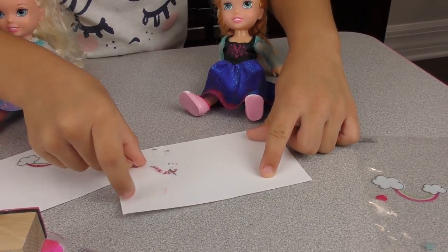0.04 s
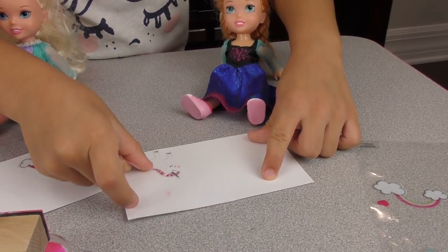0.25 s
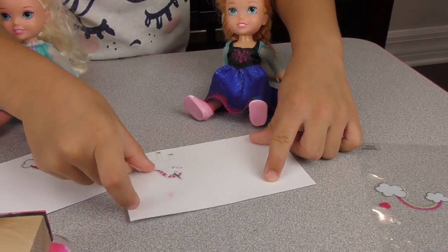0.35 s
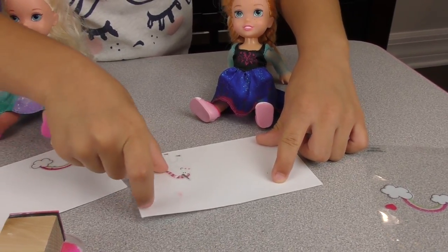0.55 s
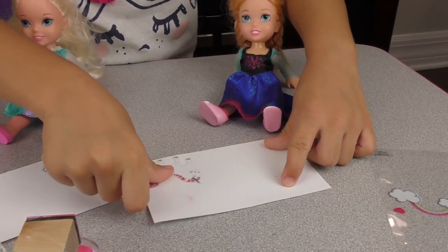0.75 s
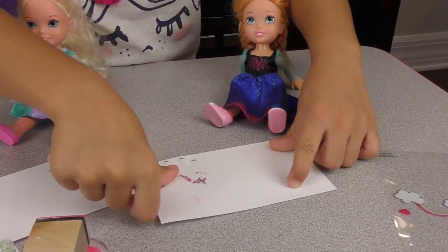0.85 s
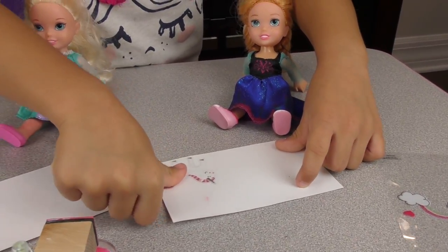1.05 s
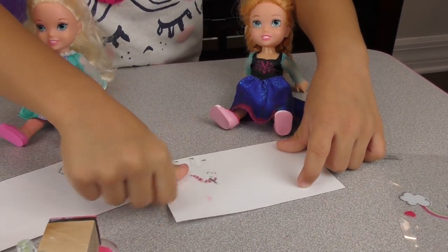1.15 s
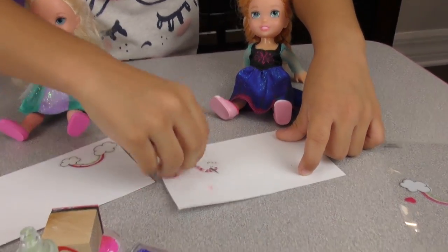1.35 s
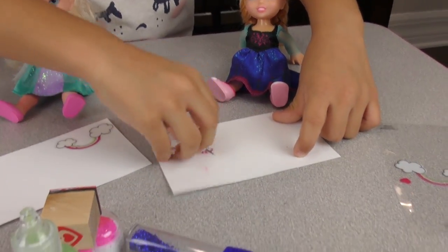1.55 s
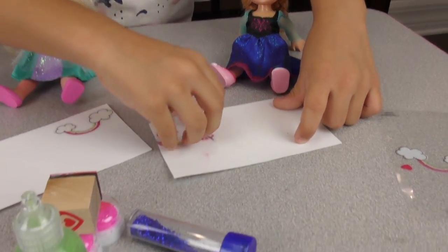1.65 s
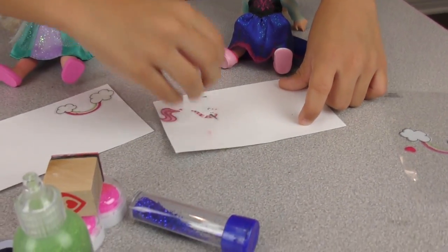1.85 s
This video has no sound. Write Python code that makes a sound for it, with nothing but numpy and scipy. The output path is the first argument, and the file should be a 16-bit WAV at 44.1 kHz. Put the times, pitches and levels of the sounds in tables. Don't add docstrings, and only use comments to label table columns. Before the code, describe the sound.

Sharp sticky-film snaps as a plastic sticker is pressed onto a card, then two tabletop knocks

```python
import sys
import numpy as np
from scipy import signal
from scipy.io import wavfile

SR = 44100
rng = np.random.default_rng(int(sys.argv[2]) if len(sys.argv) > 2 else 0)


def put_to_file(sound):
    columns = np.atleast_2d(sound).T
    safe = np.clip(columns, -1, 1)
    whole_steps = np.round(safe * 32767)
    wavfile.write(sys.argv[1], SR, whole_steps.astype(np.int16))


def ratio_of_db(decibels):
    return 10 ** (np.asarray(decibels, float) / 20)


N = 83790

# pitch [Hz], level [dB per Hz].
HUM = [(28, -52), (45, -8.5), (90, -6.5), (140, -7), (230, -5.5), (330, -15.5), (450, -19), (650, -61)]
# pitch [Hz], width [Hz], level [dB].
HUM_PEAKS = [(149.5, 53.7, -51), (217, 92, -58), (42, 15, -67)]
# pitch [Hz], level [dB per Hz].
HISS = [(600, -16), (800, -5.5), (1050, 2.5), (2400, -3), (3600, -8), (7000, -19.5), (11000, -9),
        (15800, -10.5)]
# pitch [Hz], likeness [0 to 1].
LIKENESS = [(40, 0.7), (150, 0.93), (500, 0.46), (2000, 0.4), (4400, 0.16), (8000, 1), (14000, 0.27)]
HUM_DB, HUM_PATCHY_DB, HUM_TOP_HZ, HUM_PAN_DB = -51, 2.5, 480, 0.4
HISS_DB = -57.5

# time in seconds, level [dB].
MOTOR = [
    (0, -54.5),
    (.3, -55),
    (.51, -55.5),
    (.535, -81),
    (.7, -78),
    (1.045, -65),
    (1.065, -55.5),
    (1.4, -56),
    (1.9, -54),
]
# pitch [Hz], width [Hz], level [dB].
HOUSING = [(1067, 51, -1), (1440, 410, -2.5), (1888, 66, 9.5), (1940, 28, 13.5), (2210, 310, 3.5),
           (2470, 210, 0.5), (2789, 56, 8), (3400, 330, -8), (3599, 84, 5), (1904, 1390, 1)]
MOTOR_WAVER_DB = 3

# pitch [Hz], time to fall 60 dB [s].
ROOM_T60 = [(200, 0.29), (1000, 0.56), (4000, 0.58), (8000, 0.48), (12000, 0.27), (16000, 0.48)]
# pitch [Hz], level [dB].
ROOM_COLOUR = [(200, 3.5), (1000, 8), (4000, 4), (8000, 2.5), (10500, -2.5), (13000, -5), (16000, 6)]
ROOM_DB, ROOM_GAP_S, ROOM_LIKENESS = -11.5, 0.0023, 0.87

# start [s], rise [s], fall [s], level [dB], grain pitch [Hz].
RUBS = [(0.039, 0.016, 0.036, -46.5, 11500), (0.072, 0.0032, 0.012, -45.5, 13000),
        (.078, 0.0041, 0.0083, -38, 13300), (.924, 0.0088, 0.11, -57.5, 10800),
        (.94, 0.082, .09, -62.5, 11100), (1.198, 0.061, 0.019, -51.5, 10900),
        (1.305, 0.0053, 0.013, -53, 11000), (1.315, 0.018, 0.05, -49, 10300),
        (1.431, 0.0044, 0.014, -37, 10600), (1.465, 0.02, .015, -48.5, 11300),
        (1.617, 0.0025, 0.016, -29, 10100), (1.618, 0.003, 0.057, -47, 11020),
        (1.67, 0.039, 0.036, -49, 11400), (1.824, 0.0056, 0.035, -50, 12100),
        (1.835, 0.028, 0.035, -53.5, 11300)]
# pitch [Hz], level [dB per Hz].
RUB = [(900, -12), (2500, -6), (5000, -9), (8500, -11), (11300, -7.5), (13000, -7), (16000, -6)]
RUB_GRAIN_DB = 3
GRAIN_WIDTH_HZ, GRAIN_DB = 3400, 5

# time in seconds, level [dB], contact [s], what rings (0, 1 table; 2 card).
KNOCKS = [
    (0.509, -33.5, 0.001, 2),
    (0.515, -40, 0.001, 2),
    (1.058, -43.5, 0.00083, 2),
    (1.264, -37.5, 0.00083, 2),
    (1.4365, -17, 0.0022, 0),
    (1.4550, -32.5, 0.0038, 0),
    (1.6217, -20, 0.0028, 1),
    (1.6270, -13.5, 0.002, 1),
]
# pitch [Hz], level [dB], time to fall 60 dB [s].
TABLE_A = [(43, -33, 0.35), (166.6, -19.5, 0.21), (205.5, -11, 0.072), (285, 6.5, 0.018),
           (383.5, -20, 0.34), (422, -4, 0.044), (474, -22, 0.09), (617, -10, 0.036), (1227, -9.5, 0.076),
           (1570, 4.5, 0.015), (2060, -11.5, 0.079)]
# pitch [Hz], level [dB], time to fall 60 dB [s].
TABLE_B = [(42, -31.5, 0.79), (141, -47, 0.34), (245, -18, 0.068), (375.3, -19.5, 0.13), (428, 3.5, 0.025),
           (460, -17, 0.104), (1118, -5, 0.097), (1160, -23, 0.077), (610, -21, 0.04), (1611, -1, 0.062),
           (2050, -16, 0.036), (1390, -2, 0.017)]
# pitch [Hz], level [dB], time to fall 60 dB [s].
CARD = [(439, -3, 0.022), (712, -4.5, 0.024), (1086, 6.5, 0.027), (1190, 0, 0.044)]
NAIL_DB = -17
MODE_PAN_DB, TABLE_LOW_HZ = 2.5, 106
SCUFF_DB, SCUFF_T60_S, SCUFF_LOW_HZ, SCUFF_HIGH_HZ = -25, 0.035, 513, 2570

# time in seconds, peak [dB], ring pitch [Hz], dull part [dB],
# left over right [dB].
SNAPS = [(0.0452, -35, 9500, -22, 3), (.0501, -27, 12600, -22, 7), (0.051, -30, 12500, -25, 3),
         (0.055, -23, 10000, -22, -4), (0.0746, -33, 12500, -9, -3), (0.081, -22, 13000, -30, 4),
         (0.083, -21, 13900, -30, 4), (0.2494, 2.5, 11030, -25.5, 1.5), (.2556, -23, 9500, -34, 0),
         (.2643, -19, 8800, -25, 0), (.4634, -41, 10900, -13, 7), (.4820, -5.5, 12600, -22, 0.5),
         (.4970, -28, 9200, -25, -1), (.5010, -26, 11000, -25, 0), (.5080, 2, 12000, -20, 1),
         (0.516, -21.5, 11800, 2.5, 4.5), (0.519, -29, 8000, -3, -5), (.5230, -11, 9000, -25, -1),
         (0.5275, -22, 10000, -33, 1), (0.535, -22, 12000, -25, 0), (.5405, -26, 14000, -25, 0),
         (0.565, -24, 7960, -25, 0), (0.9284, -36.5, 10900, -22, 7), (1.156, -46.5, 6000, 4.5, .1),
         (1.26, -34, 10000, -6, 8), (1.268, -35.5, 9900, 3.5, -6), (1.4307, -26, 9300, -4, 2.1),
         (1.4338, -16, 11400, -15, -1), (1.483, -35, 11500, -9, 6), (1.618, -15, 9200, -10, -1),
         (1.6707, -31, 9800, -6, 2)]
SNAP_WIDTH_HZ, DULL_LOW_HZ, DULL_HIGH_HZ = 5970, 1000, 6000
CRUMBLE_DB, CRUMBLE_T60_S = -26, 0.010
DULL_CRUMBLE_DB, DULL_T60_S = -11, 0.014
TABLE_ECHO_S, TABLE_ECHO_DB = 0.0021, -12.5
SNAP_SPREAD_S = 0.000007

CUTOFF_HZ, SNAP_CUTOFF_HZ = 16150, 17500
CLIP_TOP = 2.5
EDGES = 28 * 2 ** np.arange(0, 9.3, .4)
ROOM_EDGES = 110 * 2 ** np.arange(0, 7.4, .2)


def rms_one(x):
    return x / np.sqrt(np.mean(x ** 2) + 1e-20)


def at_hz(points, hz):
    table_hz, values = np.transpose(points)
    return np.interp(np.log(hz), np.log(table_hz), values)


def band(x, low_hz, high_hz):
    edges = [low_hz, min(high_hz, .45 * SR)]
    return signal.sosfilt(signal.butter(2, edges, "band", fs=SR, output="sos"), x)


def peak(x, hz, width_hz):
    r = np.exp(-np.pi * width_hz / SR)
    turn = 2 * np.pi * hz / SR
    return signal.lfilter([(1 - r * r) / 2, 0, (r * r - 1) / 2], [1, -2 * r * np.cos(turn), r * r], x)


def cut(x, hz):
    return signal.sosfilt(signal.cheby2(12, 60, hz, fs=SR, output="sos"), x)


def drift(rate):
    r = np.exp(-32 * np.pi * rate / SR)
    slow = signal.lfilter([1], [1, -2 * r, r * r], rng.standard_normal(N // 16 + 2002))[2000:]
    return np.interp(np.arange(N) / 16, np.arange(len(slow)), rms_one(slow))


def spread(mid, side, alike):
    alike = np.clip(alike, 0, 1)
    return np.sqrt(1 + alike) * mid + np.sqrt(1 - alike) * side * np.array([[1], [-1]])


def pair(alike, size):
    mid, side = rng.standard_normal((2, size))
    return spread(mid, side, alike) / np.sqrt(2)


def banded(spectrum, patchy_db, alike):
    out = 0
    white = rng.standard_normal((2, 2, N + 4000))
    for k, (low, high) in enumerate(zip(EDGES, EDGES[1:])):
        hz = np.sqrt(low * high)
        if spectrum[0][0] / 1.2 < hz < spectrum[-1][0] * 1.2:
            mid, side = band(white[k % 2], low, high)[:, 4000:]
            level = ratio_of_db(at_hz(spectrum, hz) + patchy_db * drift(17.6))
            out = out + level * spread(mid, side, alike(hz))
    return rms_one(out)


def hum():
    def alike(hz):
        return at_hz(LIKENESS, hz)

    low = ratio_of_db(HUM_DB) * banded(HUM, HUM_PATCHY_DB, alike)
    low = signal.sosfilt(signal.butter(4, HUM_TOP_HZ, fs=SR, output="sos"), low)
    hiss = ratio_of_db(HISS_DB) * banded(HISS, 0.24, alike)
    boom = 0
    for hz, width, db in HUM_PEAKS:
        boom = boom + ratio_of_db(db) * rms_one(peak(peak(pair(0.8, N), hz, width), hz, 4 * width))
    return (low + hiss + boom) * ratio_of_db(np.array([[HUM_PAN_DB], [-HUM_PAN_DB]]) / 2)


def motor():
    gears = pair(0.69, N)
    whir = 0
    for k, (hz, width, db) in enumerate(HOUSING):
        ring = rms_one(peak(peak(gears, hz, width), hz, 2 * width))
        whir = whir + ratio_of_db(db + MOTOR_WAVER_DB * drift(11.3)) * ring * np.sqrt(width) * (-1) ** k
    effort_db = np.interp(np.arange(N) / SR, *np.transpose(MOTOR))
    return ratio_of_db(effort_db) * rms_one(whir)


def room(x):
    size = SR // 2
    t = np.arange(size) / SR
    tail = 0
    for low, high in zip(ROOM_EDGES, ROOM_EDGES[1:]):
        hz = np.sqrt(low * high)
        fade = ratio_of_db(at_hz(ROOM_COLOUR, hz) - 60 * t / at_hz(ROOM_T60, hz))
        tail = tail + band(pair(ROOM_LIKENESS, size), low, high) * fade
    tail = tail * np.clip(t / ROOM_GAP_S - .5, 0, 1)
    tail = ratio_of_db(ROOM_DB) * tail / np.sqrt(np.sum(tail ** 2) / 2)
    return signal.fftconvolve(x[None], tail, axes=1)[:, :N]


def rubs():
    t = np.arange(N) / SR
    out = 0
    hiss = banded(RUB, patchy_db=1.0, alike=lambda hz: 1)
    for s, rise, fall, db, hz in RUBS:
        swell = np.clip((t - s) / rise, 0, 1)
        fade = np.exp(-3 * np.clip((t - s - rise) / fall, 0, 30) ** 1.3)
        singing = rms_one(hiss + ratio_of_db(GRAIN_DB) * peak(hiss, hz, GRAIN_WIDTH_HZ))
        out = out + ratio_of_db(db) * swell * fade * singing
    return out * ratio_of_db(RUB_GRAIN_DB * drift(280))


def knocks():
    t = np.arange(N) / SR
    out = np.zeros((2, N))
    rattle = rms_one(band(pair(0.36, N), SCUFF_LOW_HZ, SCUFF_HIGH_HZ))
    no_lows = signal.butter(2, TABLE_LOW_HZ, "high", fs=SR, output="sos")
    for surface, modes in enumerate((TABLE_A, TABLE_B, CARD)):
        soft = np.full(N, 1e-18)
        hard = np.full(N, 1e-18)
        for s, db, contact, struck in KNOCKS:
            if round(struck) != surface:
                continue
            phase = np.clip((t - s) / contact, 0, 1)
            soft -= ratio_of_db(db) * np.sin(np.pi * phase) ** 2 * 2 / (contact * SR)
            hard[int(s * SR)] += ratio_of_db(db + NAIL_DB)
            out += rattle * phase * ratio_of_db(db + SCUFF_DB - 60 * np.maximum(t - s, 0) / SCUFF_T60_S)
        soft_high = signal.sosfilt(no_lows, soft)
        for k, (hz, db, t60) in enumerate(modes):
            if hz > 800:
                force = hard
            else:
                force = soft_high if k else soft
            r, turn = ratio_of_db(-60 / (t60 * SR)), 2 * np.pi * hz / SR
            ring = signal.lfilter([0, np.sin(turn)], [1, -2 * r * np.cos(turn), r * r], force)
            out += ratio_of_db(db + MODE_PAN_DB * (-1) ** k * np.array([[.5], [-.5]])) * ring
    return out


def snaps():
    size = 2048
    out = np.zeros((2, N + size))
    t = np.arange(size) / SR
    for s, db, hz, dull_db, pan_db in SNAPS:
        click = np.exp(-.5 * ((t - .0002 - s * SR % 1 / SR) * SR / .6) ** 2)
        tearing = rng.standard_normal(size) * (t > .0003)
        film = click + ratio_of_db(CRUMBLE_DB - 60 * t / CRUMBLE_T60_S) * tearing
        slap = click + ratio_of_db(DULL_CRUMBLE_DB - 60 * t / DULL_T60_S) * tearing
        bright = peak(peak(film, hz, SNAP_WIDTH_HZ), hz, 0.79 * SNAP_WIDTH_HZ)
        dull = band(band(slap, DULL_LOW_HZ, DULL_HIGH_HZ), DULL_LOW_HZ, 2 * DULL_HIGH_HZ)
        snap = bright / np.abs(bright).max() + ratio_of_db(dull_db) * dull / np.abs(dull).max()
        snap = snap + ratio_of_db(TABLE_ECHO_DB) * np.interp(t - TABLE_ECHO_S, t, snap, left=0)
        both = np.array([snap, np.interp(t - SNAP_SPREAD_S, t, snap)])
        i = int(s * SR) - 9
        out[:, i:i + size] += ratio_of_db(db + np.array([[pan_db], [-pan_db]]) / 2) * both
    return out[:, :N]


def scene():
    background = hum() + motor()
    soft = rubs() + knocks()
    snap = snaps()
    reflections = room((snap + soft).mean(axis=0))
    return cut(snap, SNAP_CUTOFF_HZ) + cut(soft + reflections + background, CUTOFF_HZ)


def band_limit(x):
    return signal.sosfilt(signal.butter(12, 17150, fs=SR, output="sos"), x)


def record(dry):
    rounded = CLIP_TOP * np.tanh(dry / CLIP_TOP)
    return band_limit(np.clip(rounded, -1, 1))


dry = scene()
out = record(dry)
put_to_file(out)
```